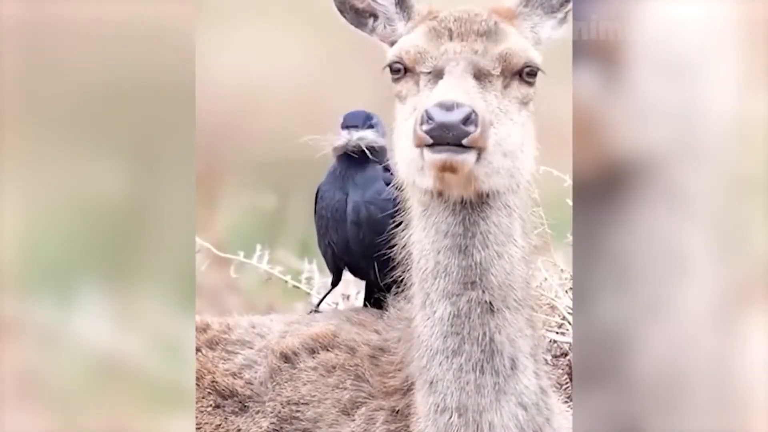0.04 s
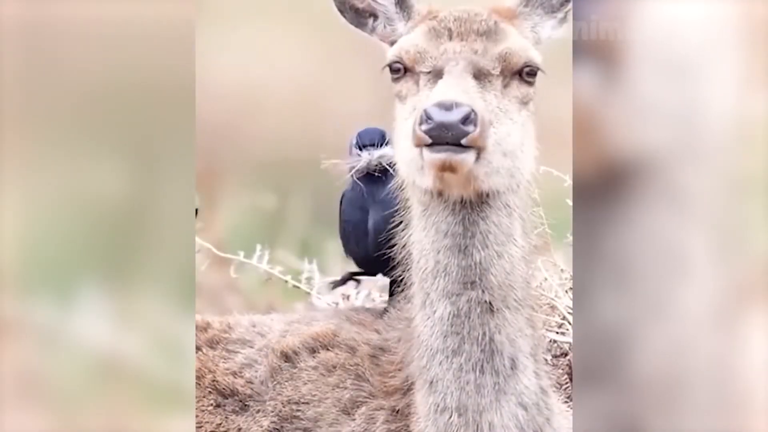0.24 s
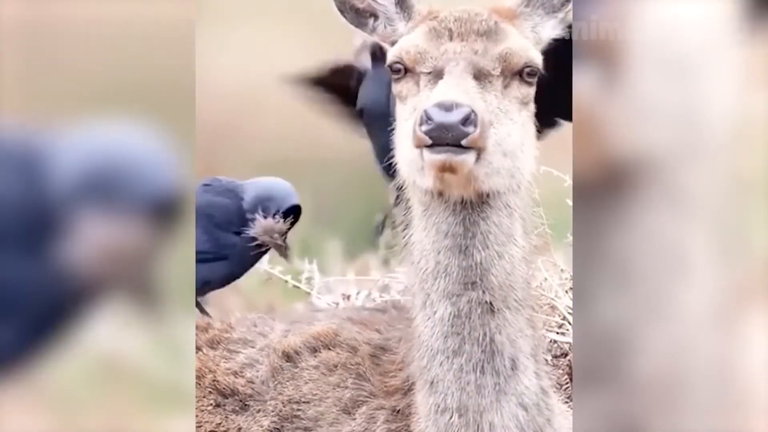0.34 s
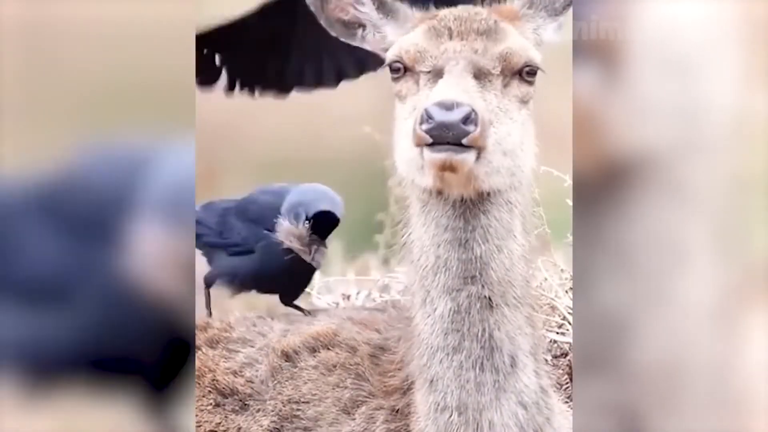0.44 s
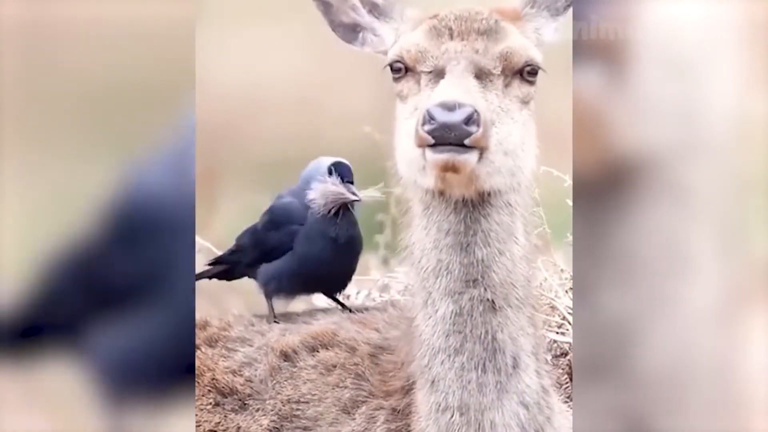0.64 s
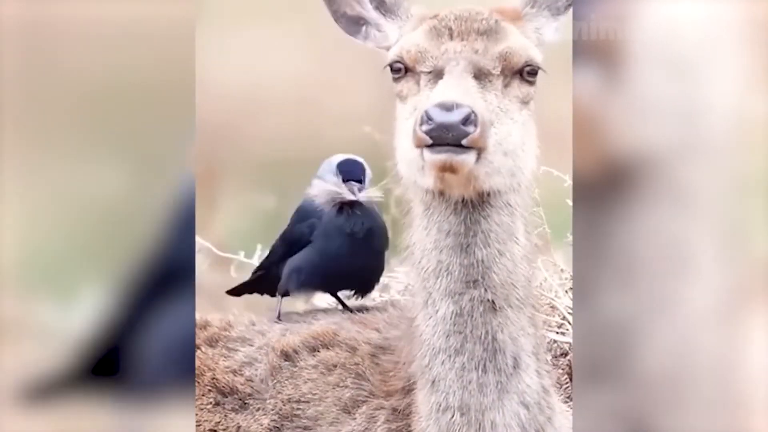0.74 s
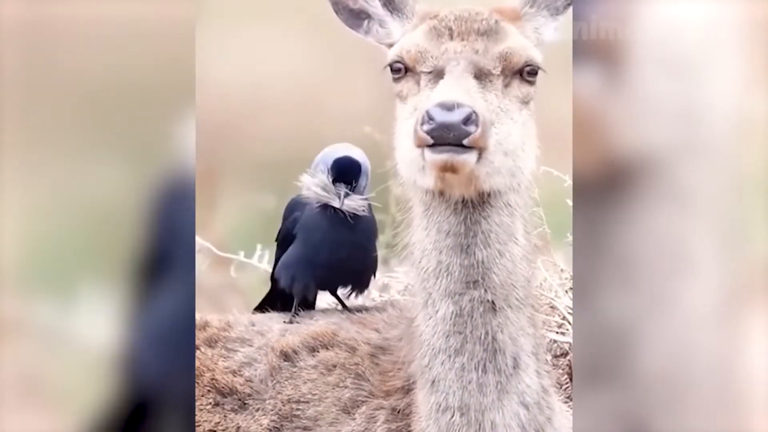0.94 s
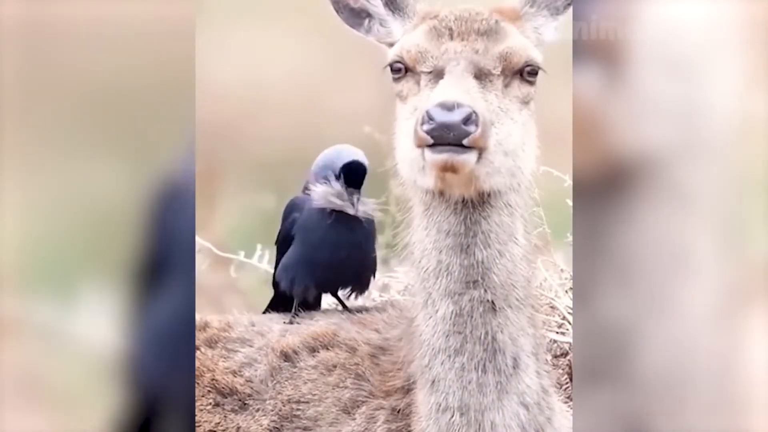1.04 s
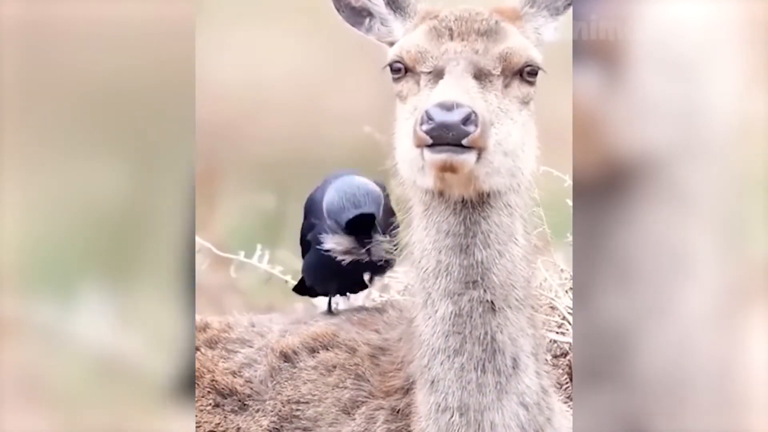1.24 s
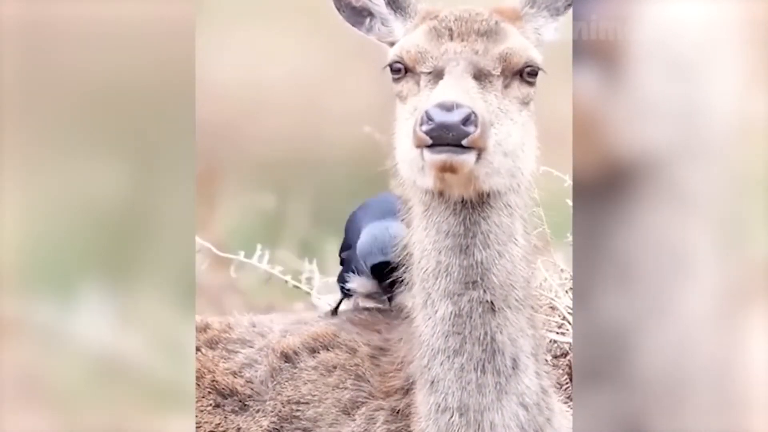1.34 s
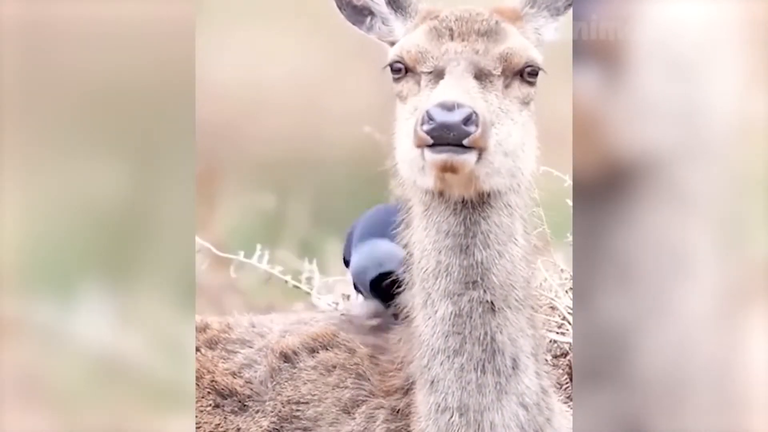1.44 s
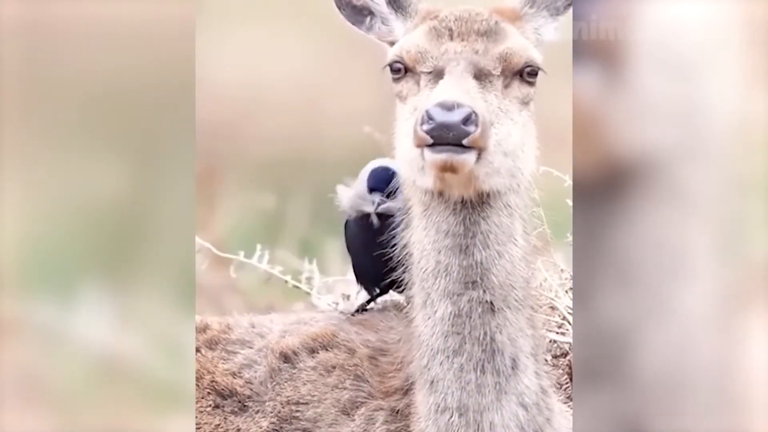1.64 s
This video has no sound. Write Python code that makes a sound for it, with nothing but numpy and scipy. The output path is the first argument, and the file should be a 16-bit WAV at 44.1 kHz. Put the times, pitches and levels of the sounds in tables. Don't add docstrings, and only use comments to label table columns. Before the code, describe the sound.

A small bird's sharp, chattering chirp close by, then faint distant calls over quiet open air

```python
import sys
import numpy as np
from scipy import signal
from scipy.fft import rfft, irfft
from scipy.io import wavfile
from scipy.ndimage import uniform_filter1d

SR = 44100
rng = np.random.default_rng(int(sys.argv[2]) if len(sys.argv) > 2 else 0)


def log_audio(samples):
    frames = np.atleast_2d(samples).T
    limited = np.clip(frames, -1, 1)
    pcm = np.round(limited * 32767).astype(np.int16)
    wavfile.write(sys.argv[1], SR, pcm)


def nominal_scale(level):
    x = np.asarray(level, float) / 20
    return 10 ** x


N = 74970

# (frequency [Hz], density [dB per Hz])
TRAFFIC = [(90, -24), (140, -8.5), (280, -7), (420, -9), (650, -3.5), (880, -11.5), (1100, -22.5),
           (1400, -25)]
# (frequency [Hz], density [dB per Hz])
LEAVES = [(300, -11), (1300, -2), (3300, -3.5), (5000, -9), (8500, -12), (12000, -14), (14000, -24.5),
          (15700, -37.5)]
# (time [s], level [dB])
GUSTS = [(0.028, -54.5), (0.137, -56), (0.179, -52.5), (0.238, -49.5), (0.319, -58), (0.41, -59),
         (0.489, -50.5), (0.65, -53.5), (0.759, -58), (0.849, -56), (0.919, -61), (1.029, -53.5),
         (1.124, -54), (1.188, -52.5), (1.389, -61.5), (1.559, -60)]
# (time [s], pitch [Hz], level [dB])
THUDS = [
    (.025, 122, -54),
    (.172, 129, -53.5),
    (1.135, 142.2, -55.5),
    (0.174, 75, -58.5),
    (.72, 150, -67),
    (1.59, 140.4, -61),
]
# (middle [s], length [s], centre [Hz], band
# [Hz], level [dB])
FAR_CALLS = [(.46, .036, 5500, 1200, -49), (.503, .03, 4400, 1300, -52), (.503, .03, 7200, 1700, -55),
             (.318, .02, 920, 320, -49), (.462, .03, 4300, 1800, -60), (.44, .02, 5800, 500, -60),
             (.482, .025, 7000, 900, -63), (.48, .03, 4700, 1500, -64), (.605, .035, 4500, 1600, -67),
             (.642, .04, 6400, 250, -68), (.668, .03, 6650, 300, -70), (.22, .025, 1050, 500, -58),
             (.815, .08, 7500, 700, -69), (.955, .03, 5650, 250, -66), (.995, .04, 6700, 350, -71),
             (.69, .018, 820, 350, -57), (1.31, .05, 3400, 700, -73), (1.47, .07, 3300, 600, -71),
             (1.58, .08, 3280, 150, -73), (.455, .04, 11200, 1200, -72), (.348, .036, 4800, 450, -52),
             (.86, .04, 11000, 1200, -73), (.96, .03, 720, 200, -60)]
# (time [s], pitch [Hz], level [dB])
CHURR = [
    (.86, 5400, -53),
    (.885, 5250, -57),
    (.91, 4950, -61),
    (.945, 4700, -63),
    (.98, 4500, -72),
]
# (middle [s], length [s], centre [Hz], band [Hz],
# level [dB])
SPILL = [
    (.29, .018, 10700, 3000, -62),
    (.315, .03, 13800, 1600, -71),
    (.18, .025, 11600, 900, -70),
    (.325, .03, 10200, 2000, -70),
    (.23, .06, 10200, 2000, -76),
    (.27, .13, 1900, 2100, -62),
    (.19, .04, 13400, 900, -76),
    (.235, .03, 13200, 800, -76),
]
# (middle [s], length [s], centre [Hz], band [Hz], level [dB])
BUZZES = [
    (.21, 0.043, 3700, 1400, -43.5),
    (.257, .034, 3750, 2500, -31.5),
    (.255, 0.06, 6800, 2604, -44),
    (.232, 0.043, 5200, 2500, -40),
    (.285, 0.02, 5300, 2900, -27.5),
    (.315, .036, 4300, 3100, -35),
    (.181, .02, 4900, 800, -57),
    (.212, .036, 4950, 980, -32.5),
    (.238, 0.026, 3800, 1300, -27.5),
]
# (middle [s], length [s], centre [Hz], band [Hz], level [dB])
BURSTS = [
    (.1805, .022, 7350, 1400, -38),
    (.204, .026, 7500, 1300, -51),
    (.2905, .02, 7700, 2300, -24),
    (.318, .03, 7300, 2400, -34),
    (.808, .026, 7500, 1200, -55),
    (.855, .02, 5500, 1100, -46),
]
# (middle [s], length [s], pitch [Hz], sweep [Hz/s], level [dB])
PEEPS = [
    (.322, .009, 3900, 150000, -30),
    (.2075, .011, 4960, -8000, -22),
    (.2152, .005, 4830, 0, -19),
    (.2228, .009, 5040, 15000, -18),
    (.305, .004, 4750, 0, -21),
    (.201, .005, 4900, 0, -29),
]
# (middle [s], length [s], pitch [Hz], gap between voices [Hz], level [dB])
WHISTLES = [
    (.3232, .013, 4830, 165, -12),
    (.3118, .015, 4770, 170, -21),
    (.244, .024, 4020, 300, -23),
    (.226, .03, 3250, 40, -29),
    (.331, .012, 4800, 150, -24),
    (.4575, .016, 5750, 230, -42),
]

TRAFFIC_DB, LEAVES_DB = -57.5, -65.5
TRAFFIC_PATCHY_DB, LEAVES_PATCHY_DB = 1.6, 0.9
WIND_HZ, WIND_DB, WIND_LUMP_DB = 44.9, -66.5, 0
GUST_S, GUST_HZ = 0.032, 26
DRONE_HZ, DRONE_BAND_HZ, DRONE_DB = 298, 22, -69
THUD_S = 0.034
CHURR_BAND_HZ = 1100
STEEP_EDGE, SOFT_EDGE = 7.3, 3
FAR_CORNER, ROUND_CORNER, PEEP_CORNER, ABRUPT_CORNER = 2.3, 3, 4.5, 5
GLIDE_PER_S, SWELL_DB_PER_S = 1.2, 150
BREATH_DB, BREATH_WIDTH = -10, 1.5
SONG_LOW_HZ, SONG_HIGH_HZ, SKIRT_HZ, LEAK_DB = 3000, 8680, 90, -28
ECHO_DB, ECHO_T60_S, SIDE_DB = -34, 0.072, -34


def evened(x):
    return x / np.sqrt(np.mean(abs(x) ** 2) + 1e-20)


def flutter(band_hz, edge, size=N):
    f = np.fft.fftfreq(size, 1 / SR)
    z = rng.standard_normal((size, 2)) @ [1, 1j]
    rolloff = np.sqrt(1 + abs(2 * f / band_hz) ** (2 * edge))
    return evened(np.fft.ifft(z / rolloff))


def note(middle, length, hz, wobble, corner):
    start = round(middle * SR) - 4096
    out = np.zeros(N + 8192)
    t = (np.arange(8192) + start) / SR - middle
    envelope = np.exp(-abs(2 * t / length) ** corner)
    z = wobble(t) * envelope
    z = z / np.sqrt(np.sum(abs(z) ** 2) / np.sum(envelope ** 2))
    sound = np.sqrt(2) * (z * np.exp(2j * np.pi * hz * t)).real
    out[max(start, 0):start + 8192] = sound[max(-start, 0):]
    return out[:N]


def wash(spectrum, level_db, patchy_db):
    frames, hz = N // 256 + 5, np.fft.rfftfreq(1024, 1 / SR)
    a, b, patches = rng.standard_normal((frames, 513, 3)).T
    patches = uniform_filter1d(patches, size=10, axis=0)
    patches = evened(uniform_filter1d(patches, size=10, axis=1))
    f, db = np.transpose(spectrum)
    colour_db = np.interp(np.log(hz + 1), np.log(f + 1), db, -80, -80)
    z = (a + 1j * b) * nominal_scale(colour_db[:, None] + patchy_db * patches)
    noise = signal.istft(z, nperseg=1024, noverlap=768)[1][:N]
    return nominal_scale(level_db) * evened(noise)


def drone():
    t = np.arange(N) / SR
    carrier = np.exp(2j * np.pi * DRONE_HZ * t)
    return nominal_scale(DRONE_DB) * (carrier * flutter(DRONE_BAND_HZ, SOFT_EDGE)).real


def wind():
    lumps_db = WIND_LUMP_DB * flutter(16.0, STEEP_EDGE).real
    rumble = nominal_scale(WIND_DB + lumps_db) * flutter(2 * WIND_HZ, STEEP_EDGE).real
    puffs = sum(nominal_scale(db - 1.5) * note(s, GUST_S, GUST_HZ, lambda t: 1j + 0 * t, 2) for s, db in GUSTS)
    return rumble + puffs


def thuds():
    return sum(nominal_scale(db) * note(s, THUD_S, hz, lambda t: 1 + 0 * t, 2) for s, hz, db in THUDS)


def buzz(corner, edge, middle, length, hz, band_hz, db):
    rough = flutter(band_hz, edge, size=8192)
    return nominal_scale(db) * note(middle, length, hz, lambda t: rough, corner)


def churr():
    t = np.arange(N) / SR
    s, hz, db = np.transpose(CHURR)
    carrier = np.exp(2j * np.pi * np.cumsum(np.interp(t, s, hz)) / SR)
    fade = uniform_filter1d(nominal_scale(np.interp(t, s, db, -200, -200)), size=300)
    return np.sqrt(2) * fade * (carrier * flutter(CHURR_BAND_HZ, SOFT_EDGE)).real


def far_birds():
    return sum(buzz(FAR_CORNER, SOFT_EDGE, *r) for r in FAR_CALLS) + churr()


def echoes(x):
    t = np.arange(8192) / SR
    tail = rng.standard_normal(8192) * nominal_scale(-60 * t / ECHO_T60_S)
    return signal.fftconvolve(x, tail / np.linalg.norm(tail))[:N]


def peep(middle, length, hz, sweep, db):
    return nominal_scale(db) * note(middle, length, hz, lambda t: np.exp(1j * np.pi * sweep * t ** 2), PEEP_CORNER)


def whistle(middle, length, hz, gap_hz, db):
    breath = nominal_scale(BREATH_DB) * flutter(BREATH_WIDTH * gap_hz + 150, SOFT_EDGE, size=8192)

    def voices(t):
        beat = np.sqrt(2) * np.sin(np.pi * gap_hz * t) + breath
        glide = np.exp(1j * np.pi * GLIDE_PER_S * hz * t ** 2)
        return beat * nominal_scale(SWELL_DB_PER_S * t) * glide
    return nominal_scale(db) * note(middle, length, hz, voices, ROUND_CORNER)


def song_band(x):
    f = np.fft.rfftfreq(N, 1 / SR)
    inside = (np.tanh((f - SONG_LOW_HZ) / SKIRT_HZ) - np.tanh((f - SONG_HIGH_HZ) / SKIRT_HZ)) / 2
    return irfft(rfft(x) * nominal_scale(LEAK_DB * (1 - inside)), N)


def near_bird():
    tones = sum(whistle(*r) for r in WHISTLES) + sum(peep(*r) for r in PEEPS)
    buzzes = sum(buzz(ROUND_CORNER, STEEP_EDGE, *r) for r in BUZZES)
    bursts = sum(buzz(ABRUPT_CORNER, STEEP_EDGE, *r) for r in BURSTS)
    spill = sum(buzz(ABRUPT_CORNER, STEEP_EDGE, *r) for r in SPILL)
    return song_band(tones + buzzes + bursts) + spill


def scene():
    background = wash(TRAFFIC, TRAFFIC_DB, TRAFFIC_PATCHY_DB) + wash(LEAVES, LEAVES_DB, LEAVES_PATCHY_DB)
    background += drone() + wind() + thuds()
    birds = far_birds() + near_bird()
    wet = echoes(birds)
    middle = background + birds + nominal_scale(ECHO_DB) * wet
    side = nominal_scale(SIDE_DB) * wet
    return middle + side * np.array([[1], [-1]])


def top_cut(x):
    return signal.sosfilt(signal.butter(12, 15700, fs=SR, output="sos"), x)


def record(dry):
    return top_cut(dry)


dry = scene()
out = record(dry)
log_audio(out)
```